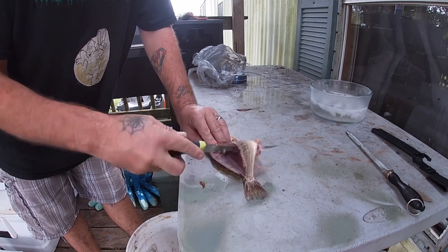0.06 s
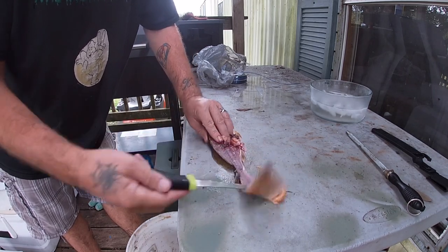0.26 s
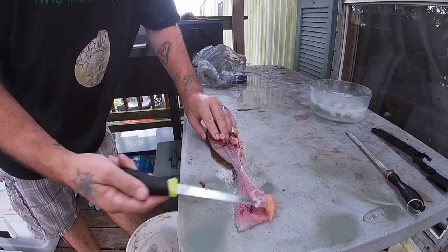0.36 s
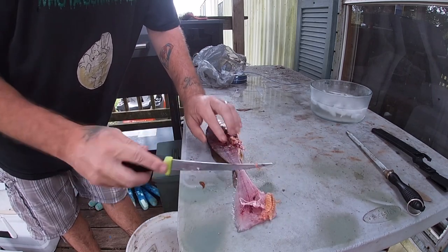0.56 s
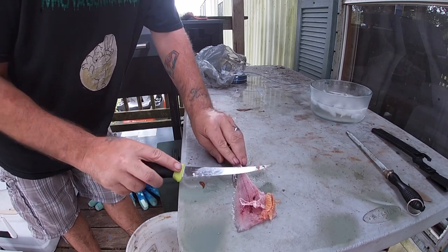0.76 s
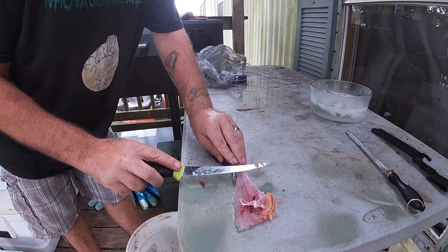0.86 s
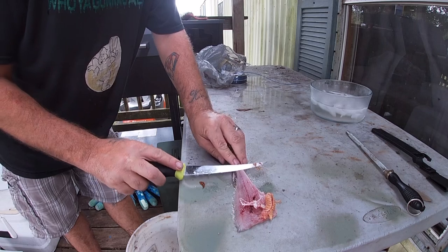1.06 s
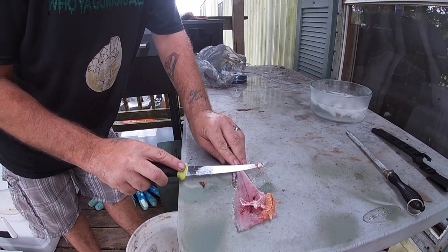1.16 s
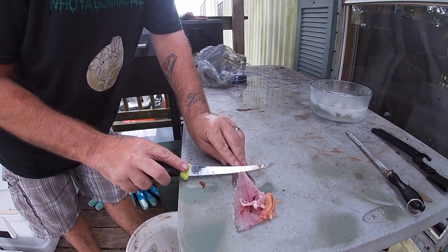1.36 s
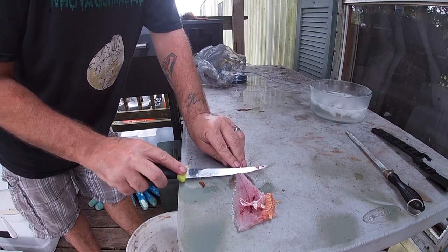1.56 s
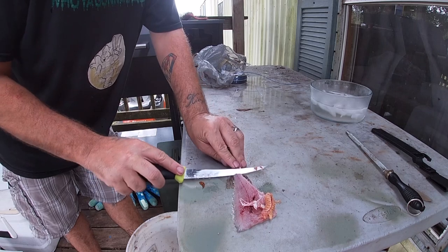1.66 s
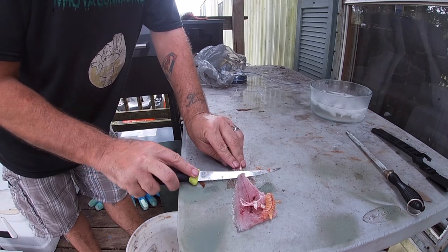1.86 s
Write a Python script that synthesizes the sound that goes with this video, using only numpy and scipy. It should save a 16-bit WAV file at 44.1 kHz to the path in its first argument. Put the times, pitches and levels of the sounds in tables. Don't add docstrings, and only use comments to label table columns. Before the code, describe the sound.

A knife rasps through fish skin, its blade clacks and rattles on a hard plastic table, then small wet ticks and a late short scrape follow, close to a small camera microphone on a humming porch.

```python
import sys
import numpy as np
from scipy import signal
from scipy.fft import rfft, irfft
from scipy.io import wavfile
from scipy.ndimage import uniform_filter1d

SR = 44100
rng = np.random.default_rng(int(sys.argv[2]) if len(sys.argv) > 2 else 0)


def ratio(d):
    e = np.asarray(d, float) / 20
    return 10 ** e


def inscribe(sig):
    pcm = np.round(np.clip(np.atleast_2d(sig).T, -1, 1) * 32767)
    wavfile.write(sys.argv[1], SR, pcm.astype(np.int16))


N = 83790
T = np.arange(N) / SR
BLADE_CONTACT_S, TABLE_CONTACT_S = 0.00047, 0.0016


def noise():
    return rng.standard_normal(N)


def unit(x):
    return x / np.sqrt(np.mean(x ** 2))


def colour(x, points):
    point_hz, point_db = np.array(points, float).T
    hz = np.maximum(np.arange(N // 2 + 1) * SR / N, 1)
    db = np.interp(np.log(hz), np.log(point_hz), point_db)
    return unit(irfft(rfft(x) * ratio(db), N))


def low(x, hz, order):
    return signal.sosfilt(signal.butter(order, min(hz, 0.45 * SR), fs=SR, output="sos"), x)


def high(x, hz):
    return signal.sosfilt(signal.butter(2, hz, "high", fs=SR, output="sos"), x)


def band(x, hz, width_hz, order):
    b, a = signal.iirpeak(min(hz, 0.45 * SR), hz / width_hz, fs=SR)
    for _ in range(order):
        x = signal.lfilter(b, a, x)
    return x


def walk(rate_hz):
    hold = int(SR / rate_hz)
    steps = np.repeat(rng.standard_normal(N // hold + 1), hold)
    slewed = uniform_filter1d(uniform_filter1d(steps, hold), hold)
    return unit(slewed[:N])


def fade(start_s, t60_s):
    return (T >= start_s) * ratio(-60 * np.maximum(T - start_s, 0) / max(t60_s, 1e-4))


def ring(start_s, modes, contact_s):
    since = T - start_s
    swell = np.sin(np.pi / 2 * np.clip(since / contact_s, 0, 1)) ** 2
    tones = sum(ratio(db) * fade(start_s, t60) * np.sin(2 * np.pi * hz * since) for hz, db, t60 in modes)
    return swell * tones


# time in seconds, level in dB, brightness in dB per octave.
STROKE_PRESSURE = [
    [(.02, -61.5, 1), (.055, -54, 0), (.14, -53, -0.5), (.21, -48, 0), (.29, -47.5, 0), (.345, -54.5, 0),
     (.4, -58.5, -7.5), (.48, -56.5, -1), (.54, -84, -1)],
    [(.96, -78, -2), (1.02, -72, 2.5), (1.07, -75, 0), (1.175, -73.5, 4), (1.184, -56.5, -.5),
     (1.25, -74, 0)],
    [(1.53, -80, 1.5), (1.6, -64, 3), (1.67, -60, 1.5), (1.71, -66, 1.5), (1.75, -58.5, 0.5),
     (1.79, -55, -1.5), (1.813, -50, -1.5), (1.87, -55.5, -1), (1.9, -72, 1)],
]
# frequency in Hz, density in dB per Hz.
SKIN_COLOUR = [(200, -6), (500, -4.5), (1900, -3.5), (3300, -3.5), (4500, -9), (7700, -10), (9000, -17),
               (15000, -28)]


def drag():
    slips_per_s, scatter_db, smear_s = 14000, 3, 0.00087
    slips = (rng.random(N) < slips_per_s / SR) * ratio(scatter_db * rng.exponential(size=N))
    smeared = signal.lfilter([1], [1, -np.exp(-1 / (smear_s * SR))], slips)
    flutter = ratio(0.8 * walk(60))
    rub = flutter * colour(smeared * noise(), SKIN_COLOUR)

    lows = [low(rub, hz, order=2) for hz in (700, 1400, 2800, 5600, 10000)]
    octaves = np.diff([0 * rub] + lows + [rub], axis=0)
    time_s, db, tilt = np.concatenate(STROKE_PRESSURE).T
    db, tilt = np.interp(T, time_s, db), np.interp(T, time_s, tilt)
    return sum(ratio(db + tilt * (k - 2.5)) * octave for k, octave in enumerate(octaves))


# frequency in Hz, level in dB, 60 dB decay in seconds.
EDGE_MODES = [(2680, -14.5, .01), (7600, -27.5, 0.0081)]
EDGE_S = 0.3586


def edge_ping():
    return ring(EDGE_S, EDGE_MODES, BLADE_CONTACT_S)


# frequency in Hz, level in dB, 60 dB decay in seconds.
TABLE_MODES = [(98.1, -32, .8), (112.2, -27.5, .4), (140.6, -30.5, 0.2), (154.8, -27.5, 0.2),
               (198.5, -33.5, .12), (232, -33, 0.16), (279.2, -35, .3), (352.5, -41, 0.17),
               (468.5, -29.5, 0.12), (611, -30, 0.13), (798, -38.5, 0.098), (916, -39.5, 0.094)]


def table_thump():
    return high(ring(0.3608, TABLE_MODES, TABLE_CONTACT_S), 75)


# time in seconds, blade level in dB, crack level in dB.
BOUNCES = [
    (.3590, 0.5, -1),
    (.3635, -5.5, -1.5),
    (0.3698, -20, -7.5),
    (.382, -35, -11.5),
    (.396, -27, -17),
]
# frequency in Hz, level in dB, 60 dB decay in seconds.
BLADE_MODES = [(1524.5, -37.5, 0.12), (1789, -41, 0.11), (2100, -51, 0.09), (2230, -48, .08),
               (2275, -35, .1), (2410, -41, .06), (2610, -36, 0.084), (2890, -47, 0.094), (3036, -39, 0.14),
               (3290, -47, 0.079), (3468, -34.5, 0.07), (5130, -42, .06)]
# frequency in Hz, density in dB per Hz.
CRACK_COLOUR = [(300, 1.5), (700, -1), (1150, -11), (2400, 1), (3500, -4.5), (4300, -9), (8000, -13),
                (16000, -30)]


def blade_bounces():
    crack_db, crack_t60_s, tail_db, tail_t60_s = -26, 0.031, -36, 0.21
    crack = colour(noise(), CRACK_COLOUR)
    out = ratio(tail_db) * fade(EDGE_S, tail_t60_s) * crack[::-1]
    for start_s, blade_db, bounce_db in BOUNCES:
        out = out + ratio(blade_db) * ring(start_s, BLADE_MODES, BLADE_CONTACT_S)
        out = out + ratio(crack_db + bounce_db) * fade(start_s, crack_t60_s) * crack
    return out


# time in seconds, peak level in dB, pitch in Hz, ring in seconds.
WET_TICKS = [(.041, -45.5, 5000, 0.0028), (.198, -43, 6500, 0.0035), (.2555, -52, 6100, .002),
             (.3965, -49, 12740, .002), (.4540, -58, 12000, .003), (.470, -52, 7800, .006),
             (.5705, -47, 10400, .002), (.5715, -56, 12960, .002), (.5725, -44, 7600, .003),
             (1.015, -56, 6000, .004), (1.1125, -49.5, 6540, .003), (1.1125, -54, 4000, 0.0036),
             (1.113, -57, 12000, .003), (1.130, -57, 12000, .003), (1.181, -49, 3000, .004),
             (1.181, -52, 5470, .004), (1.188, -60, 12000, .003), (1.200, -59, 12000, .003),
             (1.561, -57, 11800, .003), (1.5765, -51, 11800, .003), (1.5765, -48.5, 7040, .002),
             (1.595, -57, 12000, .002), (1.649, -53, 12000, .002), (1.723, -57, 12000, 0.0033),
             (1.8125, -48, 11800, .003), (1.8125, -44, 4550, .004), (1.811, -41.5, 2200, 0.0084),
             (1.836, -48, 7000, .002), (1.843, -51, 12000, .003), (1.869, -49, 11500, .002)]


def wet_ticks():
    source = noise()
    out = np.zeros(N)
    for k, (start_s, peak_db, hz, ring_s) in enumerate(WET_TICKS):
        burst = np.roll(source, 997 * k) * fade(start_s, 4 * ring_s)
        click = band(burst, hz, min(2500, hz / 2), order=2)
        out = out + ratio(peak_db) * click / np.abs(click).max()
    return out


# time in seconds, frequency in Hz, level in dB, 60 dB decay in seconds.
BLADE_PINGS = [
    (1.182, 1570, -46, 0.069),
    (1.182, 2300, -55, .06),
    (1.808, 2144, -47.5, 0.1),
    (1.808, 1600, -53, .08),
    (1.805, 657, -45, 0.11),
    (1.808, 1082, -47.5, 0.13),
]


def blade_pings():
    return sum(ring(start_s, [(hz, db, t60_s)], TABLE_CONTACT_S) for start_s, hz, db, t60_s in BLADE_PINGS)


# start in seconds, end in seconds, clicks per second, level in dB.
SCALE_CRACKLE = [
    (.2, .33, 1500, -73),
    (1.56, 1.697, 1400, -69.5),
    (1.748, 1.88, 1500, -73),
]


def scale_crackle():
    when = rng.random(N)
    size = ratio(2.4 * rng.exponential(size=N)) * np.sign(noise())
    clicks = np.zeros(N)
    for start_s, end_s, rate, db in SCALE_CRACKLE:
        clicks = clicks + ratio(db) * ((T > start_s) & (T < end_s) & (when < rate / SR))
    return 10 * band(clicks * size, 12000, 3300, order=2)


# time in seconds, level in dB.
HUM_SWELL = [(0, -43), (.03, -51.5), (.14, -47), (.29, -42.5), (.35, -45), (.49, -38), (.58, -42),
             (.68, -39.5), (.8, -45), (1.0, -45), (1.2, -44), (1.36, -42), (1.45, -46), (1.52, -43),
             (1.6, -48.5), (1.78, -49), (1.82, -60), (1.87, -46.5)]
# multiple of the running pitch, level in dB.
HUM_LINES = [(.45, -13), (1, 0), (3, -20), (4, -28)]
# frequency in Hz, width in Hz, level in dB.
CABINET_MODES = [(95.9, 13.3, -54), (110.9, 11.2, -54.5), (179.9, 12.7, -61.5), (331.8, 10.3, -68.5),
                 (566, 60, -65.5), (1071, 10, -68.5)]


def freezer():
    hum_hz, wander, mean_db = 58.9, 0.0017, -43.5
    cabinet_follow = 0.35
    phase = 2 * np.pi * np.cumsum(hum_hz * (1 + wander * walk(3.8))) / SR
    swell = ratio(np.interp(T, *np.array(HUM_SWELL, float).T))
    hum = np.sqrt(2) * swell * sum(ratio(db) * np.sin(k * phase) for k, db in HUM_LINES)
    rumble = sum(ratio(db) * unit(band(noise(), hz, width, order=2)) for hz, width, db in CABINET_MODES)
    return hum + (swell / ratio(mean_db)) ** cabinet_follow * rumble


# frequency in Hz, density in dB per Hz.
AIR_COLOUR = [(35, -14), (90, -5.5), (220, -2), (300, -11), (700, -9), (1550, -15.5), (1900, -22),
              (8500, -32.5)]


def porch_air():
    breath_db = 0.6 * walk(2.2) + 1.08 * walk(19.98)
    return ratio(-52.5 + breath_db) * low(colour(noise(), AIR_COLOUR), 9100, order=4)


# frequency in Hz, width in Hz, level in dB.
INSECT_BANDS = [(10185, 1430, -66), (13500, 2600, -80.5)]


def insects():
    throb = ratio(1.4 * walk(3.6) + 0.4 * walk(90))
    return throb * sum(ratio(db) * unit(band(noise(), hz, width, order=3)) for hz, width, db in INSECT_BANDS)


def scene():
    background = freezer() + porch_air() + insects()
    cutting = drag() + wet_ticks() + blade_pings()
    knock = edge_ping() + table_thump() + blade_bounces()
    return (background + cutting + knock + scale_crackle())[None]


def band_limit(x):
    return signal.sosfilt(signal.butter(12, 15650, fs=SR, output="sos"), x)


def record(dry):
    mix = high(low(dry, 14400, order=16), 20)
    return band_limit(mix)


dry = scene()
out = record(dry)
inscribe(out)
```